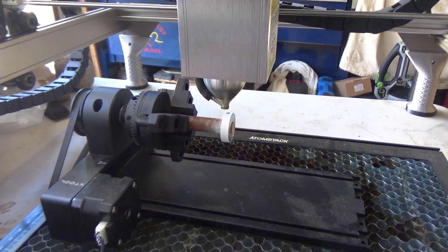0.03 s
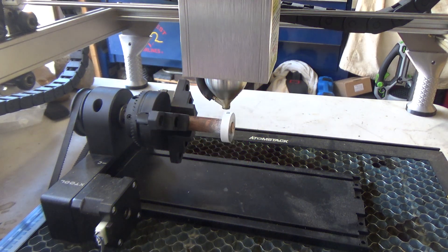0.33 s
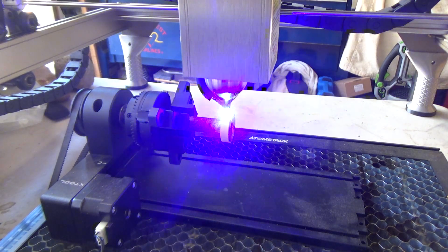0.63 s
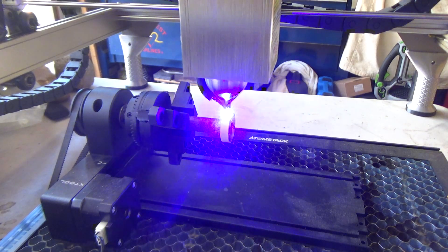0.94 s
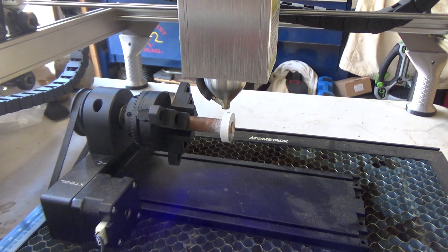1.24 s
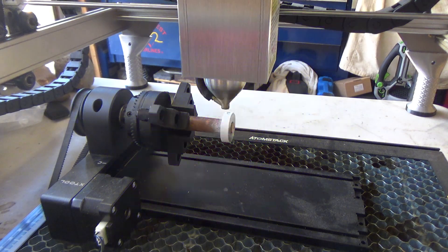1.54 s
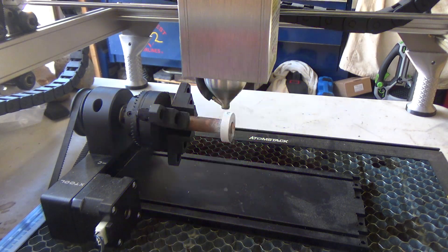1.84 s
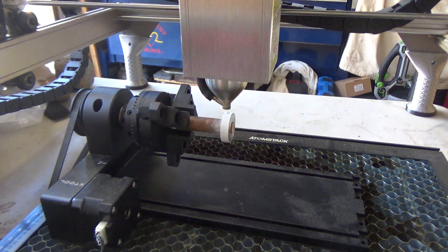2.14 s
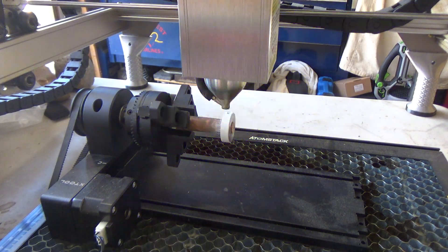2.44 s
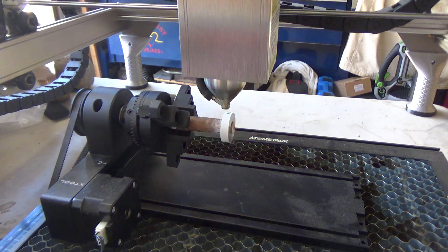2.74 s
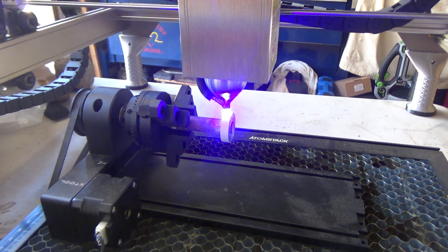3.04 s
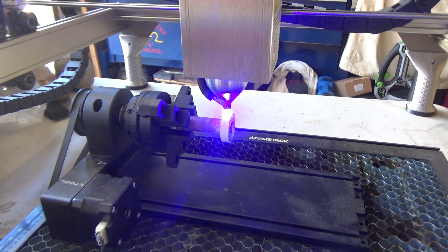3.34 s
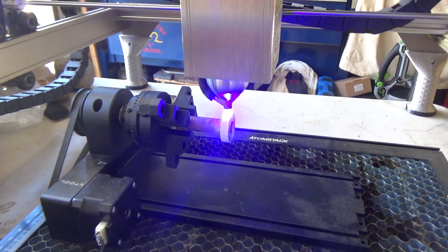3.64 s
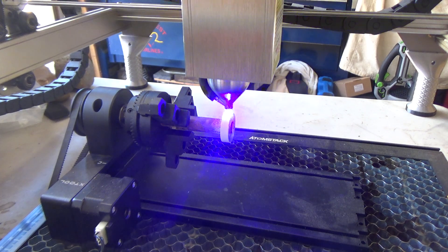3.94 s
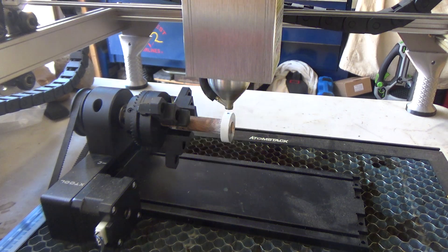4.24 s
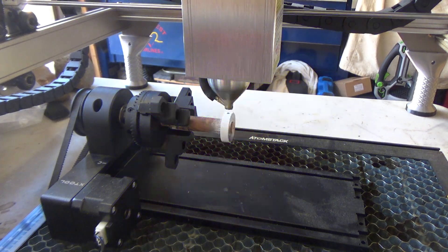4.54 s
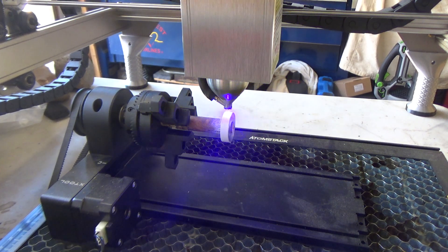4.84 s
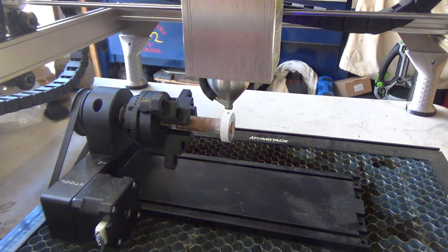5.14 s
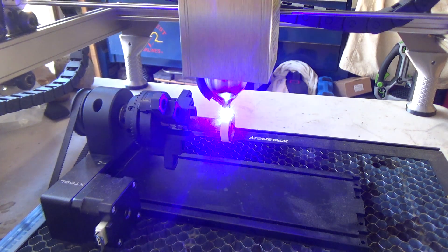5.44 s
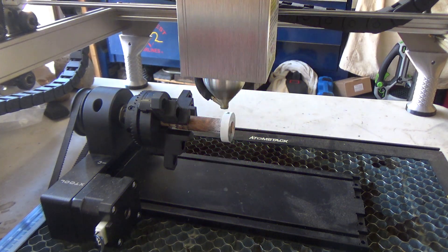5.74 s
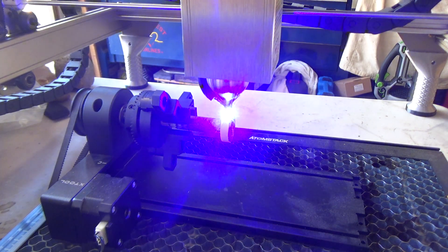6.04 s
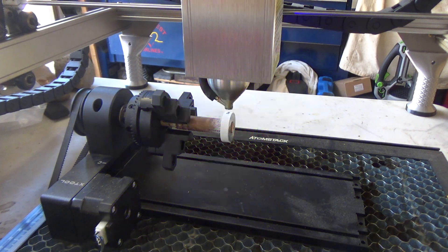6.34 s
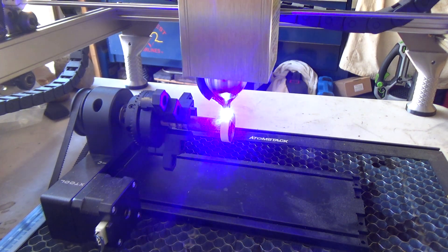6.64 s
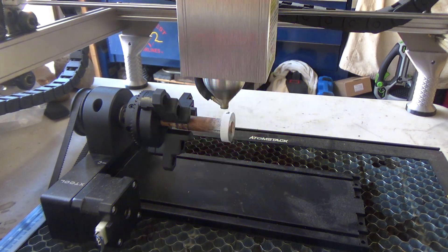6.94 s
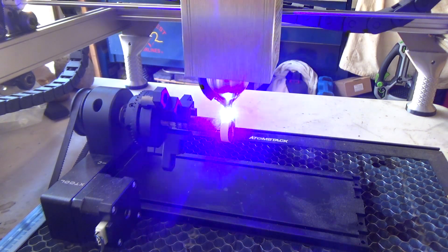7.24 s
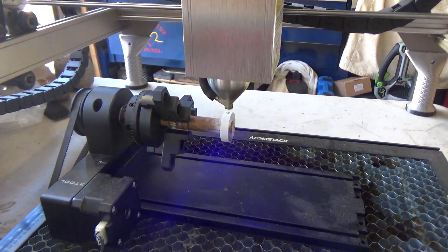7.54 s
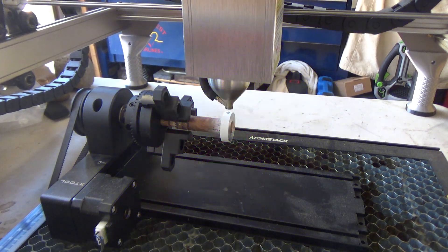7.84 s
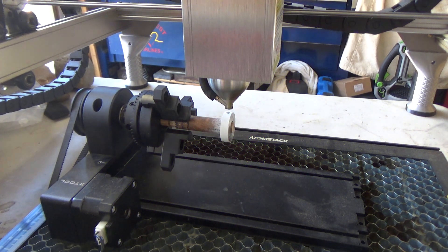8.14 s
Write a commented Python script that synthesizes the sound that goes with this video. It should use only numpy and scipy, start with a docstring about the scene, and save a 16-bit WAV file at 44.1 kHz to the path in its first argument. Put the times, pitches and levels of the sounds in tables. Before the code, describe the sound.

A laser engraver's small cooling fan is already running at the start, heard close up in a workshop, and continues for the whole eight seconds or so. The main sound is a loud, high, whistle-like whine on one nearly fixed pitch, with a few much fainter overtones above it. Beneath it, and about as loud, is an even rush of air through the machine's head, with very little bass and a lightly flickering hiss from the air jet on top. The whine flutters faintly and swells slightly as the fan slows, around 1.7 seconds and again near 7 seconds. At about 3.7 seconds the whine drops out for a split second and comes straight back while the air carries on. The hiss eases almost imperceptibly toward the end. The sound stays centred and fairly dry throughout.

```python
"""The small seven-bladed head fan of a diode laser engraver, heard close up in a workshop.
It spins at about 186 turns a second: a loud blade whine over a bed of air rushing through the head.
The speed sags a little and recovers as the job goes on, and the whine leans in as the fan slows.
The blade tone drops out once, briefly; on top, the air jet's hiss flickers and slowly eases."""
import sys
import numpy as np
from scipy import signal
from scipy.fft import rfft, irfft
from scipy.io import wavfile

SR = 44100
rng = np.random.default_rng(int(sys.argv[2]) if len(sys.argv) > 2 else 0)


def pcm_store(signal):
    """Save signal as 16-bit PCM."""
    levels = np.round(np.clip(np.atleast_2d(signal), -1, 1) * 32767)
    wavfile.write(sys.argv[1], SR, levels.astype(np.int16).T)


N = 360738
FAN_HZ, BLADES = 185.6, 7
AIR_DB, HIGH_CUT_HZ = -18.5, 10250

# The fan's partials: shaft_multiple, level_db, flutter_share, left_over_right_db, left_lead_rad
FAN_PARTIALS = [(1, -63.5, .2, -3.5, 0.013), (7, -18.5, 0.046, 0.7, .13), (12, -38, 0.12, 1, 0.0056),
                (14, -42.5, 0.17, -1.5, 0), (21, -47, .25, -1, 0)]
# Drift of the shaft speed around FAN_HZ: time_s, offset_hz
SPEED_DRIFT = [(0, -0.068), (0.4, 0.32), (1.15, 0.21), (1.7, -0.24), (2.25, 0.11), (2.9, -0.03),
               (3.45, 0.24), (4.5, -0.02), (4.95, 0.31), (5.35, -0.099), (6.9, -0.23), (8.18, 0.069)]
# The blade tone's one dropout: centre_s, half_length_s, depth_db
BLADE_DROPOUT = (3.657, .026, -23)
# Broad EQ of the rushing air: frequency_hz, gain_db
AIR_EQ = [(30, -46), (95, -42), (260, -30.5), (400, -19.5), (760, -22.5), (950, -9.5), (1250, -0.5),
          (1500, -10), (1950, -9.5), (2250, -15), (5700, -17.5), (7500, -15.5), (9200, -15.5), (10100, -28)]
# Resonances and notches of the head and the bed under it: centre_hz, width_hz, gain_db
HOUSING_EQ = [(292.4, 17.4, 6), (760, 22, 3.5), (870, 19, 3), (1126, 23, -2), (1214, 52, 1.5),
              (1691, 86, 5.5), (1702, 18, 3), (2182, 74, -4), (2700, 88, -5), (2835, 34, -4), (2945, 45, 2),
              (3060, 25, 3.5), (3180, 25, 4.5), (3746, 250, 4), (3990, 130, -4), (4650, 450, 2),
              (6120, 142, -1.5), (6780, 250, 4.5), (7820, 130, 2), (8210, 180, -5.5), (8640, 64, 3),
              (8770, 80, -2.5), (9020, 110, 2)]
# Stereo width of the air, diffuse against direct: frequency_hz, side_over_mid_db
AIR_WIDTH = [(30, -12), (90, -6), (300, -13.5), (500, -14), (730, -11), (900, -17), (1120, -15),
             (1300, -21), (1480, -19), (1670, -28), (1950, -15), (3100, -16.5), (4200, -19), (10000, -19)]
# Panning of the air: frequency_hz, left_over_right_db
AIR_PAN = [(100, 0.5), (190, -2), (450, -1.5), (1100, -0.4), (3000, -0.3), (6000, -0.5)]


def gain_of(db):
    """Decibels to a gain."""
    return 10 ** (np.asarray(db) / 20)


def unit_rms(x):
    """Scales to an rms of 1."""
    return x / np.sqrt(np.mean(x ** 2) + 1e-20)


def eq_curve(points, hz):
    """Joins breakpoints along a log-frequency axis."""
    point_hz, db = np.transpose(points)
    return np.interp(np.log(hz + 1), np.log(point_hz + 1), db)


def wander(rate_hz):
    """A smooth random modulator of rms 1, moving at up to about rate_hz."""
    hz = np.fft.rfftfreq(N, 1 / SR)
    return unit_rms(irfft(rfft(rng.standard_normal(N)) / (1 + (hz / rate_hz) ** 4), N))


def pan(left, right, pan_db):
    """A stereo pair tilted to the left by pan_db."""
    return np.array([left * gain_of(pan_db / 2), right * gain_of(-pan_db / 2)])


def fan_whine(jitter=0.00014, jitter_hz=6, flutter_hz=8, beat_hz=6.0, beat_depth=0.083, load_db_per_hz=2):
    """Shaft and blade tones ride one speed; uneven inflow makes each of them flutter."""
    t = np.arange(N) / SR
    drift_hz = np.interp(t, *np.transpose(SPEED_DRIFT))
    shaft_hz = (FAN_HZ + drift_hz) * (1 + jitter * wander(jitter_hz))
    shaft_angle = 2 * np.pi * np.cumsum(shaft_hz) / SR
    load_db = -load_db_per_hz * drift_hz  # the blade tone swells as the fan is loaded and slows
    centre_s, half_length_s, depth_db = BLADE_DROPOUT
    dropout_db = depth_db * np.exp(-((t - centre_s) / half_length_s) ** 4)
    beat_angle = 2 * np.pi * np.cumsum(beat_hz + wander(0.99)) / SR
    beating = 1 + beat_depth * np.exp(-1j * beat_angle)  # a faint sideband just under the blade tone
    mix = np.zeros((2, N))
    for multiple, level_db, flutter, pan_db, lead_rad in FAN_PARTIALS:
        sway = 1 + flutter * (wander(flutter_hz) + 1j * wander(flutter_hz)) / np.sqrt(2)
        if multiple == BLADES:
            sway = sway * gain_of(load_db + dropout_db) * beating
        phase = multiple * shaft_angle + 2 * np.pi * rng.random()
        tone = np.sqrt(2) * gain_of(level_db) * sway * np.exp(1j * phase)
        mix += pan((tone * np.exp(1j * lead_rad)).real, tone.real, pan_db)
    return mix


def air_rush(swell_db=0.18, swell_hz=3, flicker_db=0.62, flicker_hz=25, crossover_hz=5000,
             fade_db_per_s=0.03):
    """Turbulence of the fan and the air jet, coloured by the housing; the jet's hiss flickers and eases."""
    hz = np.fft.rfftfreq(N, 1 / SR)
    housing_db = sum(db * np.exp(-((hz - centre) / width) ** 2) for centre, width, db in HOUSING_EQ)
    colour = gain_of(eq_curve(AIR_EQ, hz) + housing_db) * early_reflections(hz) * (hz < HIGH_CUT_HZ)
    noise = rng.standard_normal((4, len(hz)))
    # both sides share the direct sound; what the room returns gives the width
    direct = noise[0] + 1j * noise[1]
    diffuse = (noise[2] + 1j * noise[3]) * gain_of(eq_curve(AIR_WIDTH, hz))
    spectra = pan(direct + diffuse, direct - diffuse, eq_curve(AIR_PAN, hz)) * colour
    low_pass = 1 / (1 + (hz / crossover_hz) ** 4)
    body = irfft(spectra * low_pass, N)
    hiss_db = flicker_db * wander(flicker_hz) - fade_db_per_s * np.arange(N) / SR
    hiss = irfft(spectra * (1 - low_pass), N) * gain_of(hiss_db)
    return gain_of(AIR_DB + swell_db * wander(swell_hz)) * unit_rms(body + hiss)


def early_reflections(hz, count=12, echo_db=-31, first_s=0.001, last_s=0.012):
    """Weak echoes off the frame and the bed, as a fine, static comb on the spectrum."""
    delays_s = rng.uniform(first_s, last_s, count)
    return 1 + gain_of(echo_db) * sum(np.exp(-2j * np.pi * hz * delay) for delay in delays_s)


def scene():
    """The fan's whine over its rushing air, both running throughout."""
    return fan_whine() + air_rush()


def record(dry):
    """A steep high cut on the whole mix."""
    high_cut = signal.firwin(511, HIGH_CUT_HZ, window=("kaiser", 9), fs=SR)
    return signal.oaconvolve(dry, high_cut[None], "same")


dry = scene()
out = record(dry)
pcm_store(out)
```